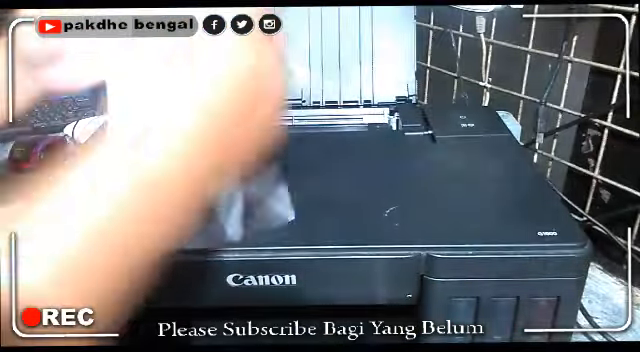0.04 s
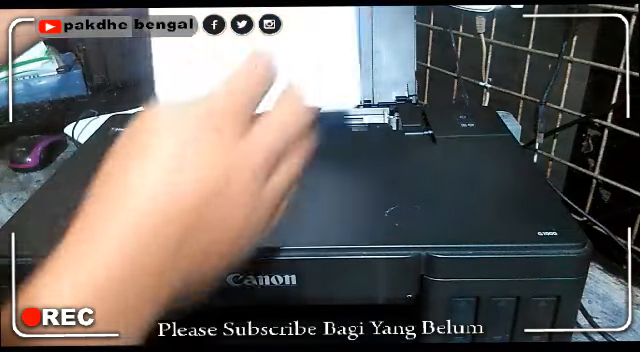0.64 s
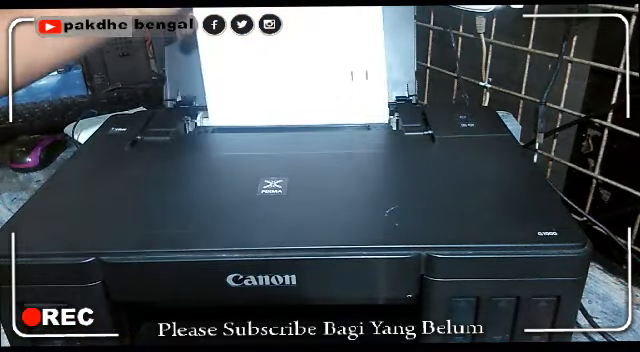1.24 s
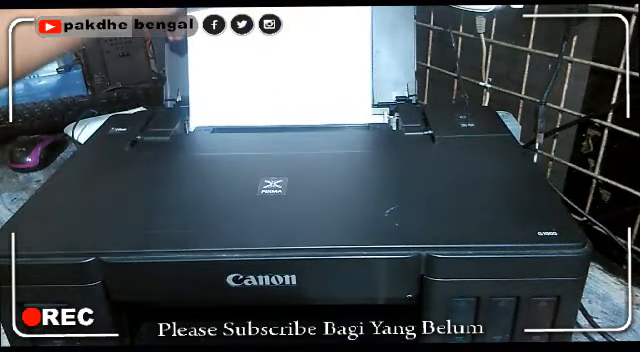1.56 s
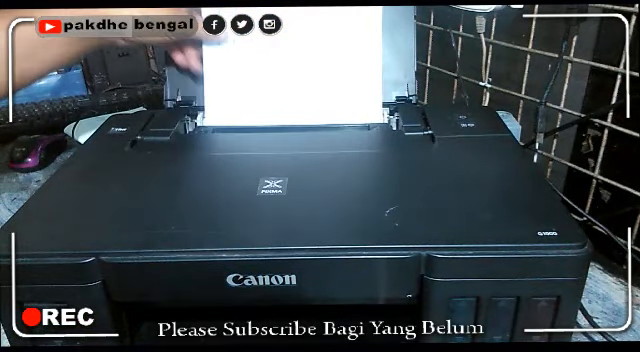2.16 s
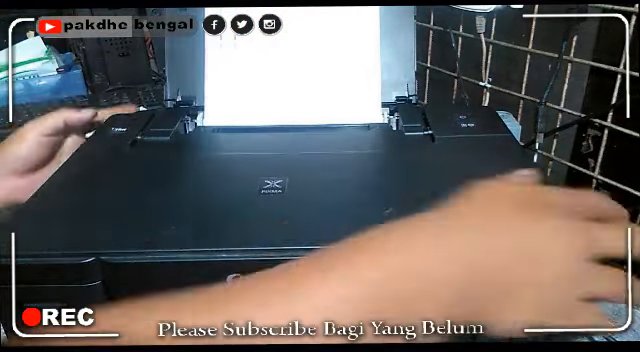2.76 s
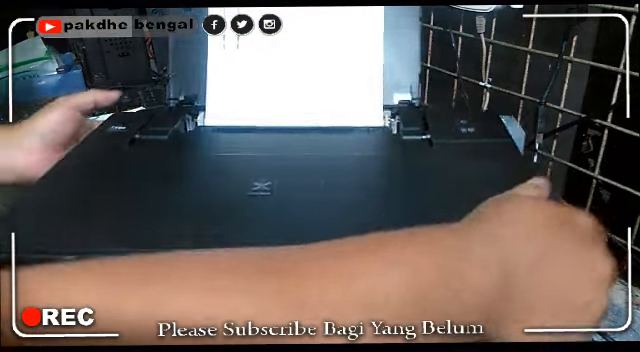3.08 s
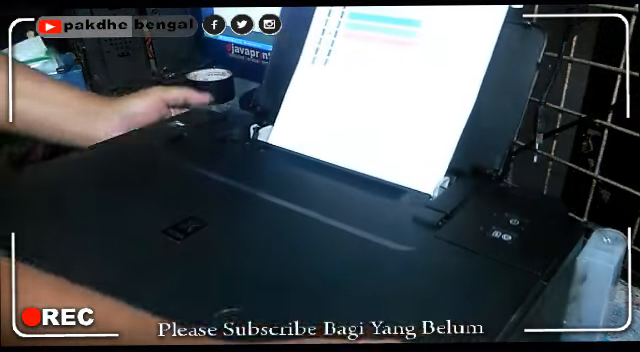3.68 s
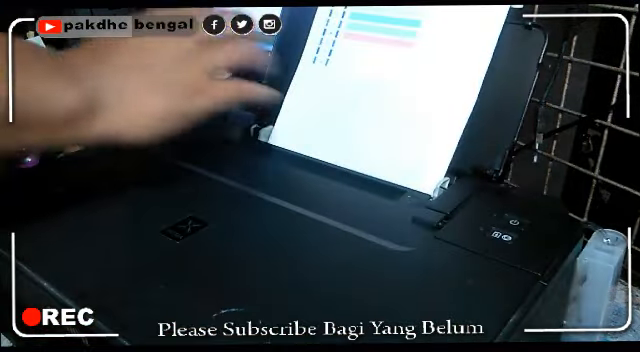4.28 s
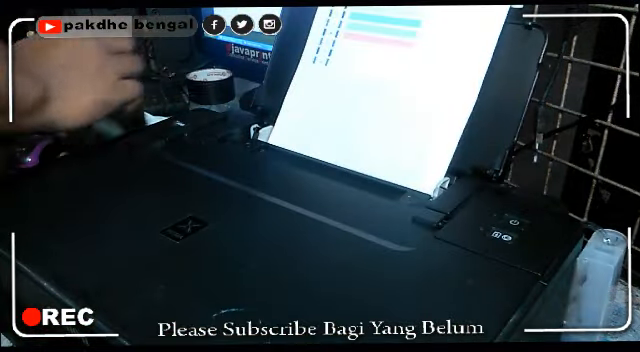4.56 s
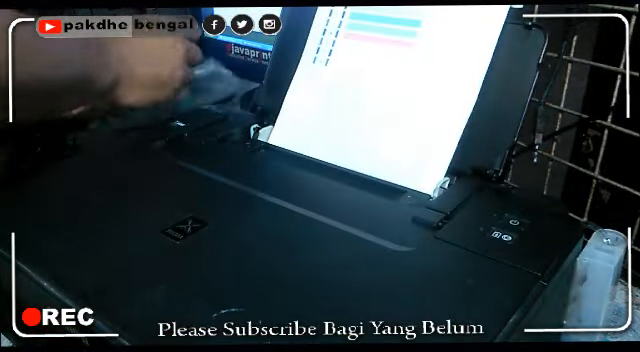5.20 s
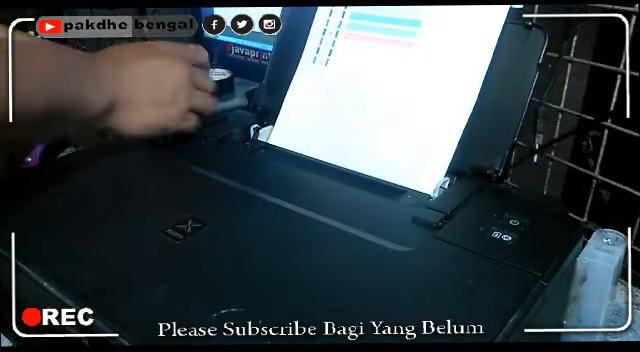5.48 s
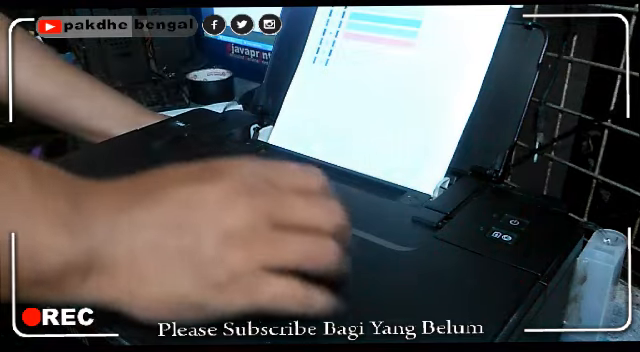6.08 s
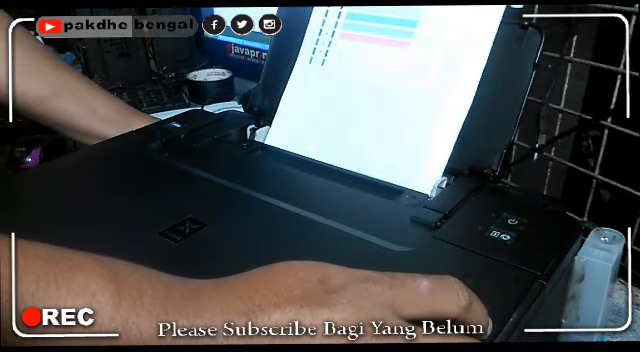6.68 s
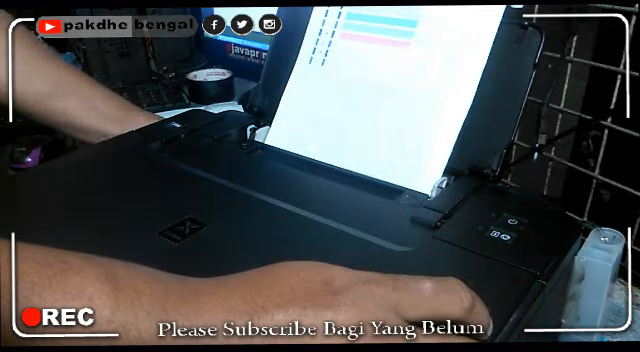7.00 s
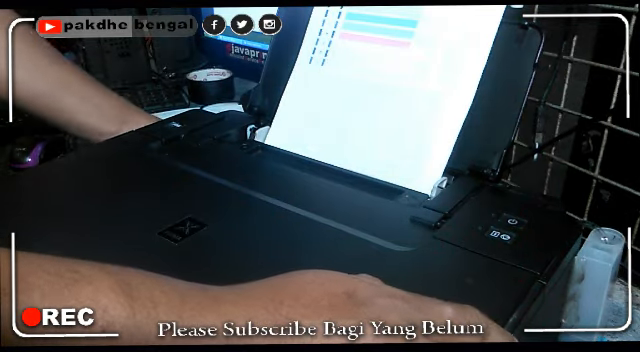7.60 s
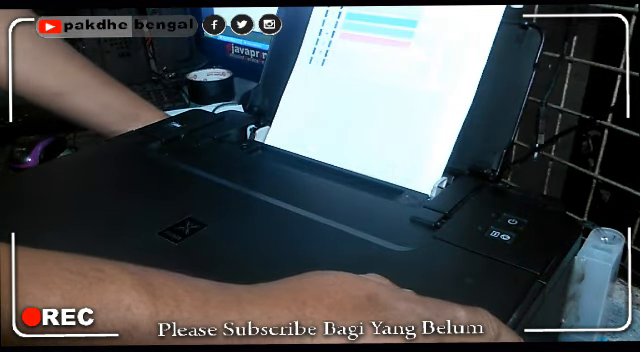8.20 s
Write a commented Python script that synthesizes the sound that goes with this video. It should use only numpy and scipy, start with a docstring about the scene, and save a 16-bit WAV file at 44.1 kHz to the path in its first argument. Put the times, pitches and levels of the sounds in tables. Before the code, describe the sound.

Close hollow knocks, clacks and a short rumbling scrape as a plastic printer is loaded with paper and shifted on a table indoors.

```python
"""A plastic desktop printer is knocked, pressed and dragged round on a table, close by in a small room.
Each knock rings its hollow shell, and its rubber feet judder and scrape as they stick and slip.
First, paper drops into the rear tray and the guide is slid against it; later something rustles behind.
All the rubbing is made of many tiny clicks, shaped by what they shake. Under it lie the room's air,
a low hum and, at first, a faint high whine."""
import sys
import numpy as np
from scipy import signal
from scipy.fft import rfft, irfft, next_fast_len
from scipy.io import wavfile
from scipy.ndimage import uniform_filter1d

SR = 44100
rng = np.random.default_rng(int(sys.argv[2]) if len(sys.argv) > 2 else 0)


def transcribe(signal):
    """Save signal, clipped to [-1, 1], as a 16-bit WAV file at the path in sys.argv[1]."""
    frames = np.atleast_2d(signal).T
    limited = np.clip(frames, -1, 1)
    pcm = np.round(limited * 32767).astype(np.int16)
    wavfile.write(sys.argv[1], SR, pcm)


N = 372644
TIME = np.arange(N) / SR
CUTOFF_HZ = 14400   # top of the treble


def from_db(db):
    """Turn a level in dB into a number to multiply by."""
    return np.exp(np.asarray(db) * (np.log(10) / 20))


def rms_one(x):
    """Scale a sound so its average strength (rms) is 1."""
    return x / np.sqrt(np.mean(x ** 2) + 1e-20)


def at_hz(points, hz):
    """Read a value off a curve of (Hz, value) points."""
    point_hz, values = np.transpose(points)
    return np.interp(np.log(hz), np.log(point_hz), values)


def level_curve(points):
    """Join (seconds, dB) points into a level in dB, silent before and after."""
    return np.interp(TIME, *np.transpose(points), left=-200, right=-200)


def add(out, start_s, sound):
    """Mix a sound into out at the given time."""
    at = max(round(start_s * SR), 0)
    out[..., at:at + sound.shape[-1]] += sound[..., :N - at]


def panned(x, pan_db):
    """Make the left side pan_db louder than the right."""
    return x * from_db(np.array([[pan_db], [-pan_db]]) / 2)


def band(x, low_hz, high_hz, order=2):
    """Keep what lies between two frequencies; a higher order gives steeper edges."""
    sos = signal.butter(order, [low_hz, min(high_hz, SR / 2.1)], "band", fs=SR, output="sos")
    return signal.sosfilt(sos, x + 1e-18)


def resonate(x, hz, width_hz):
    """Ring at one pitch; the narrower the width, the longer the ring."""
    r = np.exp(-np.pi * width_hz / SR)
    feedback = [1, -2 * r * np.cos(2 * np.pi * hz / SR), r * r]
    return signal.lfilter(np.array([1, 0, -1]) * (1 - r * r) / 2, feedback, x + 1e-18)


def colour(x, spectrum):
    """Shape a sound's bass and treble with (Hz, dB) points, then scale it to strength 1."""
    size = next_fast_len(N)
    hz = np.maximum(np.fft.rfftfreq(size, 1 / SR), 1)
    bass_fade = np.minimum(hz / spectrum[0][0], 1) ** 2
    shaped = rfft(x, size) * bass_fade * from_db(at_hz(spectrum, hz))
    return rms_one(irfft(shaped, size)[..., :N])


def drift(per_s):
    """A random wander, roughly 1 either way, that turns per_s times a second."""
    knots = rng.standard_normal(int(N / SR * per_s) + 2)
    return np.interp(TIME * per_s, np.arange(len(knots)), knots)


def strokes(rows, attack_s, release_s):
    """Loudness over time: each stroke sets in, swells or fades around its level, and dies away."""
    power, steps = 0, TIME[::32]
    for start, length, db, swell_db in rows:
        t = steps - start
        envelope = np.clip(t / attack_s, 0, 1) * np.exp(-np.maximum(t - length, 0) / release_s)
        gain = from_db(db + swell_db * (np.clip(t / length, 0, 1) - .5))
        power = power + (envelope * gain) ** 2
    return np.interp(TIME, steps, np.sqrt(power))


def slips(per_s, spread_db):
    """Friction: tiny slips click at random moments, with uneven sizes."""
    at = np.flatnonzero(rng.random(N) < per_s / SR)
    sizes = rng.exponential(1, N)[at]
    signs = np.sign(rng.random(N)[at] - .5)
    out = np.zeros(N)
    out[at] = signs * from_db(spread_db * np.minimum(sizes, 4))
    return rms_one(out)


def surge(x, edges_hz, depth_db, per_s):
    """Split a sound into frequency bands and let each swell and fade on its own."""
    return sum((-1) ** k * band(x, low, high) * from_db(depth_db * drift(per_s))
               for k, (low, high) in enumerate(zip(edges_hz, edges_hz[1:])))


def flex(x, depth_db, per_s):
    """A thin sheet bends as it moves, so its tone keeps shifting."""
    return surge(x, np.geomspace(500, 15000, 8), depth_db, per_s)


def shell(force, broad_db=-13):
    """The plastic shell rings at its main pitches, over a bed of many that die at once."""
    # Each row: pitch in Hz, width in Hz, gain in dB.
    resonances = [(228, 18, 0), (280, 32, 0), (322, 20, 3), (402, 24, -7), (508, 40, 1), (600, 42, -2),
                  (700, 40, -5), (802, 40, -1), (986, 50, 0), (1108, 46, 2), (1230, 60, -2), (1328, 55, 0),
                  (1414, 45, 0), (1680, 90, -4), (2067, 110, -9), (2180, 120, -10), (2950, 260, -13)]
    ring = sum(from_db(db) * resonate(force, hz, width) for hz, width, db in resonances)
    return ring + from_db(broad_db) * force


def room(x):
    """Echoes from the walls blur into a tail of noise that dies away band by band."""
    # Each row: frequency in Hz, seconds to fade by 60 dB.
    fade_times = [(80, 0.6), (260, 0.5), (700, 0.27), (1840, 0.29), (4850, 0.34), (12000, 0.19)]
    # Each row: frequency in Hz, echo level in dB against the direct sound.
    echo_levels = [(80, -18), (280, -12.5), (600, -3.5), (1200, -2.5), (3000, 0.5), (10000, 0.5)]
    # Each row: frequency in Hz, how alike the two ears are from 0 to 1.
    likeness = [(100, 0.6), (300, 1), (600, 0.23), (1200, 0)]
    t = np.arange(SR * 7 // 10) / SR
    edges = np.geomspace(45, 16000, 15)
    white, response = rng.standard_normal((2, 2, len(t))), 0
    onset = np.clip((t - .003) / 0.00037, 0, 1)   # the first wall answers after 3 ms
    for k, (low, high) in enumerate(zip(edges, edges[1:])):
        hz = np.sqrt(low * high)
        mid, side = band(white[k % 2], low, high) * onset * from_db(-60 * t / at_hz(fade_times, hz))
        alike = at_hz(likeness, hz)
        tail = np.sqrt(1 + alike) * mid + np.sqrt(1 - alike) * side * np.array([[1], [-1]])
        tail = tail * np.sqrt(2 * (high - low) / SR / np.sum(tail ** 2, axis=1, keepdims=True))
        response = response + tail * from_db(at_hz(echo_levels, hz))
    return signal.fftconvolve(x.mean(axis=0)[None], response, axes=1)[:, :N]


def in_room(x):
    """A sound plus the echoes that belong to its own place."""
    return x + room(x)


def ports(x):
    """Each of the microphone's two openings favours some bands of the nearby sounds."""
    # Each row: frequency in Hz, left over right in dB.
    balance = [(60, 3.5), (110, -4), (200, 6.5), (380, -2.5), (690, 2), (1280, -5), (2350, 5), (4330, -6),
               (7980, -4.5), (14700, -3.5)]
    size = next_fast_len(N)
    lean_db = at_hz(balance, np.maximum(np.fft.rfftfreq(size, 1 / SR), 1))
    return irfft(rfft(x, size) * from_db(np.array([lean_db, -lean_db]) / 2), size)[:, :N]


def background(air_db=-58.5, bass_side_db=-19, treble_side_db=-1):
    """Room air, alike at both ears in the bass, and a low electric hum."""
    # Each row: frequency in Hz, relative level in dB.
    air_tone = [(25, -30), (54, 2.5), (76, -10.5), (110, -8), (173, -23.5), (390, -21.5), (480, -27),
                (1000, -33), (1780, -41), (4400, -52), (5260, -40.5), (5800, -47.5), (10000, -42.5),
                (14000, -49)]
    # Each row: pitch in Hz, level in dB.
    hum_tones = [(48.5, -63), (101, -77.5)]
    mid, side = colour(rng.standard_normal((2, N)), air_tone)   # side sets the ears apart
    upper = signal.sosfilt(signal.butter(2, 550, "high", fs=SR, output="sos"), side)
    side = from_db(bass_side_db) * side + from_db(treble_side_db) * upper
    hum = sum(np.sqrt(2) * from_db(db) * np.sin(2 * np.pi * (hz * TIME + rng.random()))
              for hz, db in hum_tones)
    return from_db(air_db) * np.array([mid + side, mid - side]) + hum


def whine(flicker_db=2.5):
    """A faint, very high electronic whine comes and goes at first."""
    # Each row: start in seconds, length in seconds, level in dB, swell in dB.
    spells = [(0.01, .16, -75, 2), (0.47, 0.11, -74, -2), (0.65, 0.19, -73.5, 1)]
    # Each row: pitch in Hz, relative level in dB.
    pitches = [(9000, -19), (11000, -16), (13000, -2), (14000, -7)]
    tones = sum(np.sqrt(2) * from_db(db) * np.sin(2 * np.pi * hz * TIME) for hz, db in pitches)
    return strokes(spells, attack_s=0.011, release_s=0.013) * from_db(flicker_db * drift(58)) * tones


def rustle(grain_db=-2, crinkle_db=-6):
    """Something thin is handled behind the printer: a fine grain with scattered crinkles."""
    # Each row: frequency in Hz, relative level in dB.
    tone = [(240, -13), (400, 12.5), (654, -10.5), (977, -0.5), (1120, -8.5), (2090, -12.5), (2690, -6.5),
            (4260, -11), (4870, -11.5), (8070, -10.5), (11000, -12.5), (14000, -17)]
    # Each row: time in seconds, level in dB before grain_db or crinkle_db is added.
    levels = [(4.42, -74), (4.486, -65), (4.58, -78.5), (4.676, -71), (4.708, -62), (4.788, -63.5),
              (4.912, -60), (5.004, -72.5), (5.02, -66.5), (5.042, -56.5), (5.112, -61), (5.162, -64),
              (5.244, -67), (5.28, -62), (5.406, -66), (5.454, -53.5), (5.492, -57.5), (5.56, -72)]
    grain = colour(flex(slips(5000, 2.8), depth_db=3, per_s=14), tone)
    crinkles = colour(flex(slips(70, 3.0), depth_db=5, per_s=60), tone)
    texture = from_db(grain_db) * grain + from_db(crinkle_db) * crinkles
    return panned(from_db(level_curve(levels)) * texture, pan_db=-2)


def edge_scrapes(waver_db=5):
    """The rustling thing drags along an edge; quick slips ring thin pitches that come and go."""
    # Each row: start in seconds, length in seconds, level in dB, swell in dB.
    scrapes = [(5.04, 0.077, -58.5, -2), (5.44, .06, -66, -3)]
    # Each row: pitch in Hz, width in Hz, relative level in dB.
    resonances = [(2780, 300, 0), (3400, 450, -5), (4220, 400, -2), (5900, 1200, -4), (9000, 3000, -9)]
    force = slips(1500, 2.5)
    ring = sum(from_db(db + waver_db * drift(25)) * resonate(force, hz, width)
               for hz, width, db in resonances)
    return panned(strokes(scrapes, attack_s=0.016, release_s=0.013) * rms_one(ring), pan_db=-14)


def scuffs():
    """A palm or a sheet slides on the casing with a dry, uneven scuff."""
    # Each row: start in seconds, length in seconds, level in dB, swell in dB.
    swipes = [(0.125, 0.042, -59.5, 8), (0.19, 0.054, -71, -17), (1.825, 0.02, -54.5, 16),
              (2.68, 0.059, -65, 15), (2.77, 0.35, -63, 2), (3.02, 0.37, -60.5, -1)]
    # Each row: frequency in Hz, relative level in dB.
    tone = [(250, -7.5), (600, 3.5), (1300, -8.5), (2000, -5.5), (3000, -7), (4500, -15), (8000, -13),
            (13000, -21.5)]
    grain = flex(shell(slips(1800, 2.1)), depth_db=7, per_s=11)
    return strokes(swipes, attack_s=0.019, release_s=0.023) * colour(grain, tone)


def paper(gain_db=-10):
    """Paper fibres catch on the tray thousands of times a second as the sheets slide."""
    # Each row: start in seconds, length in seconds, level in dB before gain_db, swell in dB.
    slides = [(0.16, 0.08, -44.5, -13), (0.335, 0.044, -51, 8), (0.41, 0.08, -60.5, -7),
              (1.47, 0.5, -64.5, -2), (1.85, 0.2, -52, 3), (2.04, 0.082, -44, -0.5),
              (2.17, 0.24, -59.5, -10), (2.41, 0.025, -61, 31)]
    # Each row: frequency in Hz, relative level in dB.
    tone = [(400, -15.5), (700, -2), (1150, 10), (2100, -4), (3600, 0.5), (5800, -3), (9000, -5.5),
            (12000, -14), (14000, -45.5)]
    fibres = flex(slips(5000, 3.0), depth_db=2.2, per_s=18)
    return from_db(gain_db) * strokes(slides, attack_s=0.0048, release_s=0.0086) * colour(fibres, tone)


def hand_rubs(gain_db=-8.5):
    """Skin creeping over the plastic makes the shell murmur."""
    # Each row: start in seconds, length in seconds, level in dB before gain_db, swell in dB.
    rubs = [(2.3, 0.2, -48.5, 12), (2.66, 0.099, -43, 5), (2.76, 0.24, -57, -2.5), (3.01, 0.34, -41, -3),
            (4.34, 0.24, -54, -3), (5.57, 0.22, -51.5, -19), (6.03, 0.42, -55, -33),
            (6.33, 0.12, -36.5, -6), (6.45, 1, -52.5, 6.5), (7.27, 0.23, -42, 3), (7.7, 0.32, -47, -6),
            (7.96, 0.46, -52.5, -4)]
    # Each row: frequency in Hz, relative level in dB.
    tone = [(110, -52.5), (180, -7.5), (328, -8), (467, -8.5), (1000, -21.5), (2490, -33), (3590, -52.5),
            (5110, -47.5), (6000, -76), (7800, -119), (13200, -120)]
    murmur = colour(shell(slips(1100, 3.4)), tone)
    return from_db(gain_db) * strokes(rubs, attack_s=0.0033, release_s=0.0076) * murmur


def finger_pushes(rise_s=0.0079):
    """A fingertip softly swells the hollow lid's lowest note and damps it again."""
    # Each row: start in seconds, peak level in dB, pitch in Hz.
    pushes = [(2.471, -37, 306), (2.488, -42.5, 223), (3.044, -37.5, 306), (3.088, -41, 312),
              (5.018, -50.5, 342), (5.890, -20.5, 288), (6.339, -35, 302), (6.384, -23, 298),
              (6.441, -39.5, 302), (7.291, -34, 305), (7.71, -36.5, 301), (7.749, -30.5, 280),
              (7.803, -34, 289), (7.853, -31, 300), (7.874, -28, 294), (8.235, -43, 280)]
    t, out = np.arange(SR // 6) / SR, np.zeros(N)
    swell = (t / rise_s) ** 2 * np.exp(2 * (1 - t / rise_s))
    for start, db, hz in pushes:
        add(out, start, from_db(db) * swell * np.sin(2 * np.pi * hz * t))
    return band(out, 120, 600, order=3)


def clacks():
    """A thin plastic edge snaps home and chatters for a moment around its own pitch."""
    # Each row: start in seconds, strength in dB, pitch in Hz, width in Hz, seconds to fade by 60 dB.
    snaps = [(2.1255, -19, 1130, 500, 0.018), (2.1258, -28.5, 3600, 1100, 0.028),
             (2.125, -31, 5620, 780, .016), (6.052, -32.5, 2770, 330, 0.082), (7.388, -27, 3010, 220, .025)]
    t, out = np.arange(SR // 8) / SR, np.zeros((2, N))
    for start, db, hz, width_hz, fade_s in snaps:
        chatter = rng.standard_normal(len(t)) * from_db(-60 * t / fade_s)
        ring = band(chatter, hz - width_hz / 2, hz + width_hz / 2)
        add(out, start, from_db(db) * ring / np.abs(ring).max() * np.sqrt(2))
    return out


def drag(judder_db=-1, stick_slip_db=0.5, crumb_db=-21.5, firm_pull_db=-36, firm_hiss_db=-68):
    """Rubber feet judder on the table, grit rasps through the shell, crumbs grind and an edge hisses."""
    # Each row: time in seconds, level in dB.
    friction = [(3.0, -54), (3.05, -62), (3.26, -46), (3.32, -35.5), (3.42, -34.5), (3.46, -27),
                (3.57, -36), (3.82, -42.5), (3.91, -89)]
    # The feet and table top. Each row: time in seconds, level in dB before judder_db.
    rumble = [(3.0, -55), (3.026, -74), (3.258, -38.5), (3.282, -36.5), (3.326, -35.5), (3.342, -40),
              (3.406, -36), (3.438, -27), (3.54, -31), (3.632, -43.5), (3.768, -39), (3.98, -61.5)]
    # The scrape's tone. Each row: frequency in Hz, relative level in dB.
    tone = [(120, -11), (200, -5), (300, -1.5), (400, -6.5), (600, -12), (900, -11), (1500, -13.5),
            (2100, -20), (3000, -26.5), (4500, -38), (8000, -27.5), (12000, -44.5)]
    # The edge catches. Each row: start in seconds, length in seconds, level in dB, swell in dB.
    catches = [(3.56, 0.21, -57, -3)]
    feet = rms_one(band(slips(220, 1.5), 62, 106))
    # The weight shifts from foot to foot, so the bands of the scrape surge separately.
    edges_hz = [*np.geomspace(150, 2400, 6), CUTOFF_HZ]
    grit = surge(shell(slips(650, 1.8)), edges_hz, depth_db=2.2, per_s=35)
    edge = rms_one(from_db(3 * drift(70)) * band(slips(6000, 3.0), 5600, 6900, order=3))
    friction_db = level_curve(friction)
    judder = from_db(judder_db + level_curve(rumble)) * feet
    scrape = from_db(friction_db + stick_slip_db * drift(45)) * colour(grit, tone)
    hiss_db = firm_hiss_db + 1.7 * (friction_db - firm_pull_db)   # grows faster than the friction
    hiss = (from_db(hiss_db) + strokes(catches, attack_s=0.0086, release_s=0.017)) * edge
    crumbs = from_db(friction_db + crumb_db) * rms_one(band(slips(900, 2.5), 2000, 5500))
    return panned(judder + scrape + crumbs + hiss, pan_db=-0.025)


def blow(parts, levels_db, stretch, crack=3.9, rattle_db=1.5):
    """One blow: a crack and a dying rattle of loose plastic ring the given parts of the sound."""
    t = np.arange(SR // 5) / SR
    noise = rng.standard_normal((4, len(t)))
    rattle = rms_one(noise[:3] * from_db(rattle_db * noise[3]))   # both ears, left, right
    out = 0
    for (body, (fade_s, gain_db, alike)), db in zip(parts, levels_db):
        force = np.sqrt(alike) * rattle[0] + np.sqrt(1 - alike) * rattle[1:]
        force *= from_db(-60 * t / (fade_s * stretch))
        force[:, 0] += crack
        ring = signal.fftconvolve(force, body[None], axes=1)[:, :len(t)]
        loudest = np.sqrt(uniform_filter1d(np.mean(ring ** 2, axis=0), size=265).max())   # over 6 ms
        out = out + ring * from_db(db + gain_db) / loudest
    return out


def spot_ring(x, hz, width_hz=88, ring_db=1.9, rest_db=-2.51):
    """Each spot on the shell favours one pitch."""
    return from_db(rest_db) * x + from_db(ring_db) * resonate(x, hz, width_hz)


def knocks(places=3):
    """Blows on the shell: a hard one is bright, one over the hollow booms, a heavy one jolts the table."""
    # Each row: start in seconds, strength in dB, extra boom in dB, brightness in dB per octave,
    # rattle length factor, left over right in dB, pitch of the spot in Hz.
    hits = [(0.160, -37.5, 9.5, -3, 1.2, 2, 595), (0.175, -35.5, -30, -3, 2, 7.5, 610),
            (0.186, -35, 3, -8, 0.67, -4, 600), (0.229, -39, -6, -4, 1.7, 0, 590),
            (0.437, -46.5, 0.5, -24, 0.16, 3, 684), (0.578, -58.5, 2, -22, 0.67, 5, 570),
            (0.873, -72.5, -19, 3, 0.42, 19, 1080), (1.483, -54, 5, -19, 1.7, -1, 990),
            (1.589, -49.5, -2.5, -7, 1.7, -1, 1020), (1.617, -60.5, 3, 5, 1.7, -4, 1100),
            (1.657, -47.5, -24, -23, 0.27, -4, 1150), (1.848, -40, 0, -2.5, 1, -1, 1200),
            (2.114, -37.5, -10, -4, 1.7, 7, 1240), (2.1255, -29.5, -4, -4, 0.14, -1.5, 1120),
            (2.319, -55, 3.5, -22, 0.82, -2, 515), (2.434, -38.5, -29, -8, 1.2, -2, 525),
            (2.442, -43.5, 6.5, -3.5, 0.81, 0, 540), (2.645, -46.5, -5, -22, 3.9, -4, 710),
            (2.692, -51.5, 7.5, -12, 6, 1.5, 610), (2.711, -43, 2, -10.5, 1.8, -1, 580),
            (2.734, -44, -9, -4.5, 0.99, -2, 550), (2.812, -52, -25, -7, 2.7, 6, 1920),
            (2.885, -50.5, -20, -5.5, 2.5, 9.5, 1890), (3.011, -39.5, -13, -7.5, 1.5, -2, 1090),
            (3.050, -46, -6, -6.5, .7, -4, 695), (3.084, -43.5, -3, -14, .7, -2, 600),
            (3.122, -50.5, -2, -12, .7, 0, 800), (3.162, -50, 3, -12, 0.78, 0, 603),
            (3.222, -50, 0, -9, 0.63, 0, 694), (3.279, -37, -1.5, -3, 0.79, -2, 620),
            (3.286, -30.5, 12.5, -4, 0.62, 2.5, 620), (3.296, -29.5, -2, -5.5, 1.7, -2, 639),
            (3.389, -35.5, 2, -7, 0.91, -1, 600), (3.424, -36, 2, -6, 1, 0, 660),
            (3.429, -21.5, 6, -5, 1.56, 2, 1390), (3.442, -18.5, -22, -5.5, 0.78, 6, 610),
            (3.461, -28, -9.5, -6.5, 1.2, 5.5, 600), (3.472, -38, 20.5, -4.5, 1.6, -0.5, 1340),
            (3.487, -34.5, -10, -7, 1.4, -5, 1330), (3.506, -34, -7, -4, 1.2, 0, 610),
            (3.841, -35, 2.5, -24, 0.96, 0.5, 590), (3.855, -36, -0.5, -18, 0.59, 1, 600),
            (4.355, -57, -3, -18, 3, 0, 800), (4.484, -53, -12.5, -3, 2.1, -5, 1733),
            (4.516, -55, 0.5, -12, 0.55, 8, 600), (5.568, -36, -15.5, -5.5, 4.5, -1, 690),
            (5.7505, -29.5, -17, -1, 2.04, 1, 1500), (5.893, -32.5, -1, -9, 2.1, 1.5, 980),
            (5.913, -24, -6, -9, 0.8, -1, 1030), (5.935, -34, -9, -3.5, 1.36, 2, 980),
            (6.051, -31.5, -6, -7.5, 1.3, 1, 750), (6.068, -37, -2, -7.5, 1.6, 1, 1110),
            (6.088, -37, -5, -8.5, 2.6, 1, 1040), (6.114, -30, -1, -10, 0.93, -2, 760),
            (6.125, -29, -2.5, -24, 0.61, -1, 620), (6.251, -32.5, -3.5, -0.5, 1.94, 1.5, 1600),
            (6.378, -40.5, 6.5, -6.5, 2.1, 0, 750), (6.555, -50.5, 5, -22, 0.72, 2, 740),
            (6.586, -29.5, -10, -19.5, 0.79, 0, 915), (6.603, -38, -11, -15, 0.47, 3, 1090),
            (6.624, -47.5, 9.5, -22, 1.06, 1, 720), (6.724, -44.5, 1.5, -16, 0.86, 1, 1340),
            (6.748, -48.5, -1, -16, 0.65, -2, 990), (6.768, -50, -17, -12, 0.62, 9, 930),
            (6.934, -45, 4, -10, 1.5, -3, 695), (6.9485, -28, -9, -11, 0.38, -2, 657),
            (7.097, -45, 1, -18, 0.37, 0, 684), (7.113, -56.5, 11, -24, 1, 0, 594),
            (7.187, -35.5, -11.5, -7.5, 2.3, 2.5, 890), (7.369, -42, 12.5, -17, 1.3, 1, 755),
            (7.3875, -13.5, -9.5, -11.5, 0.85, -1, 760), (7.393, -23.5, -4, -2.5, 1.35, 2.5, 1450),
            (7.412, -27.5, -1.5, -20, 0.32, -2, 515), (7.53, -43, -4, -29, 1.7, 1, 1010),
            (7.674, -30, -31, -25, 0.47, 0.5, 920), (7.966, -34.5, -12.5, -9, 1.45, 0.5, 900),
            (8.096, -54, 15.5, -4.5, 1.8, 1.5, 608), (8.316, -72, 27.5, -23, 3, -0.5, 610)]
    # The whole printer jolts. Each row: start in seconds, strength in dB, rattle length factor.
    thuds = [(0.167, -49, 3.1), (2.1245, -43, .6), (3.277, -33.5, 1.1), (3.423, -26.5, 1),
             (3.855, -55.5, 1), (6.377, -53, 1), (7.388, -46, 1.5)]
    # The six parts of a blow: thud, hollow, lid, panel, clack, tick.
    # Each row: low edge in Hz, high edge in Hz, steepness of the edges (filter order).
    ranges = [(58, 106, 2), (238, 410, 4), (520, 920, 3), (920, 1750, 3), (1750, 3600, 3), (3700, 8800, 2)]
    # How those parts ring. Each row: seconds to fade by 60 dB at length factor 1, gain in dB,
    # how alike the two ears are from 0 to 1.
    rings = [(0.24, 6, 1), (0.099, -0.5, 0.98), (0.033, 1, 1), (0.1, -6.5, 0.18), (0.064, -4, 0.4),
             (0.067, -2.5, 0.12)]
    click = shell(signal.unit_impulse(SR // 12), broad_db=-6)
    thud, *plastic = [((-1) ** k * band(click, low, high, order), rings[k])
                      for k, (low, high, order) in enumerate(ranges)]
    centres_hz = np.array([np.sqrt(low * high) for low, high, _ in ranges[1:]])
    octaves_above_panel = np.maximum(np.log2(centres_hz / centres_hz[2]), 0)
    boom_share = np.array([1, 0.36, 0, 0, 0])   # the lid joins in the hollow's boom a little
    tracks = np.zeros((places, 2, N))   # hits take turns among places, each with its own echoes
    for k, (start, db, boom_db, brightness, stretch, pan_db, hz) in enumerate(hits):
        levels_db = db + boom_db * boom_share + brightness * octaves_above_panel
        knock = spot_ring(blow(plastic, levels_db, stretch), hz)
        add(tracks[k % places], start, panned(knock, pan_db))
    for start, db, stretch in thuds:
        add(tracks[0], start, blow([thud], [db], stretch, crack=13))
    return sum(in_room(track) for track in tracks)


def scene(clack_echo_db=-9):
    """All the handling echoes in the room; the clacking edges face the microphone and echo less."""
    snaps = clacks()
    handling = finger_pushes() + drag() + hand_rubs() + scuffs() + paper() + rustle() + edge_scrapes()
    nearby = in_room(handling) + knocks() + snaps + from_db(clack_echo_db) * room(snaps)
    return ports(nearby) + background() + whine()


def record(dry, low_cut_hz=36):
    """The microphone loses the deepest bass; the highest treble is cut steeply."""
    dry = signal.sosfilt(signal.butter(3, low_cut_hz, "high", fs=SR, output="sos"), dry)
    return signal.sosfilt(signal.ellip(10, .3, 70, CUTOFF_HZ, fs=SR, output="sos"), dry)


dry = scene()
out = record(dry)
transcribe(out)
```